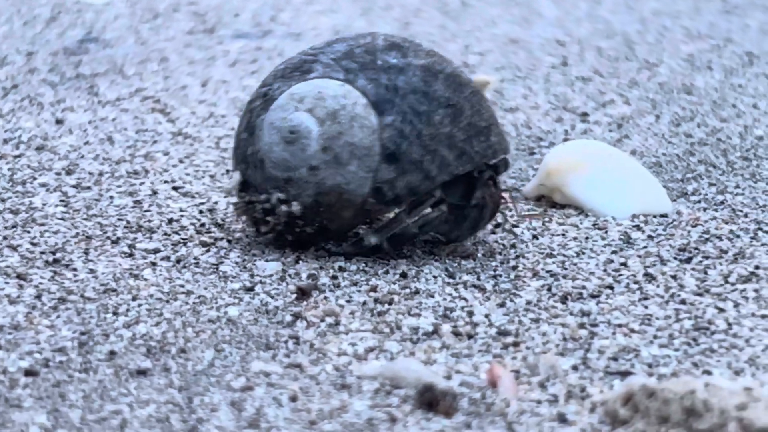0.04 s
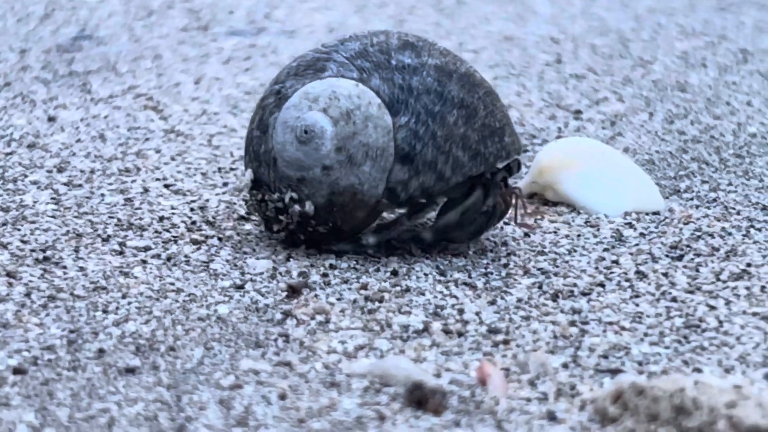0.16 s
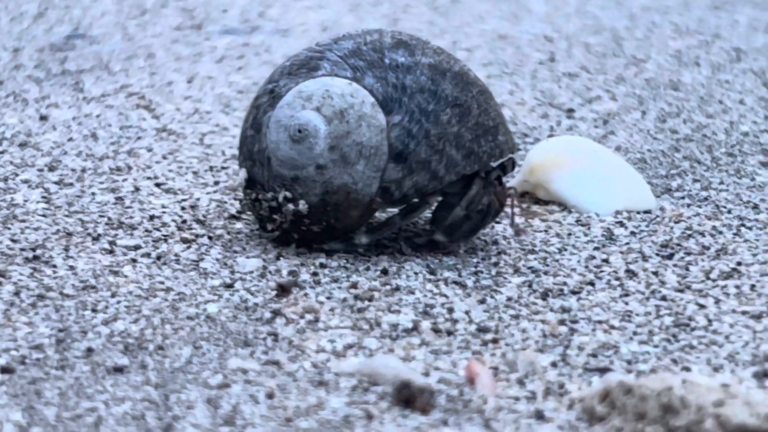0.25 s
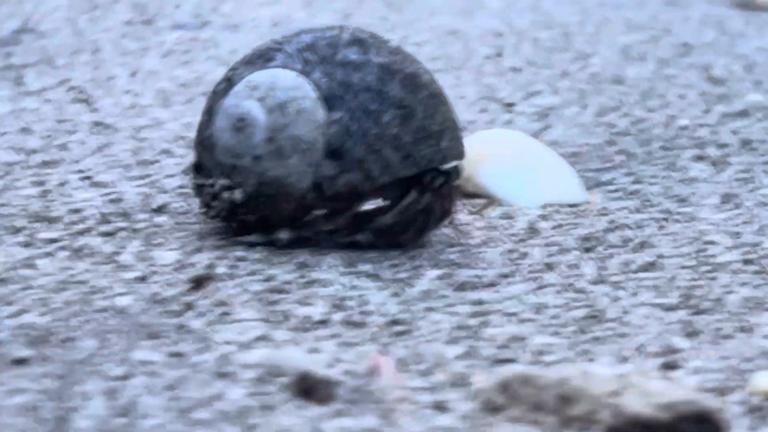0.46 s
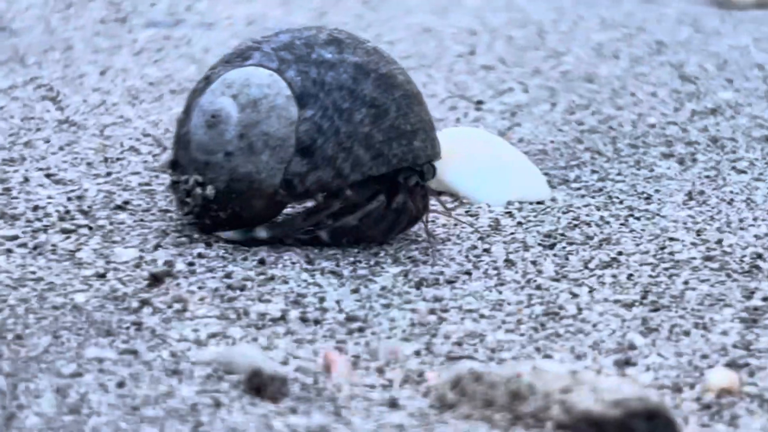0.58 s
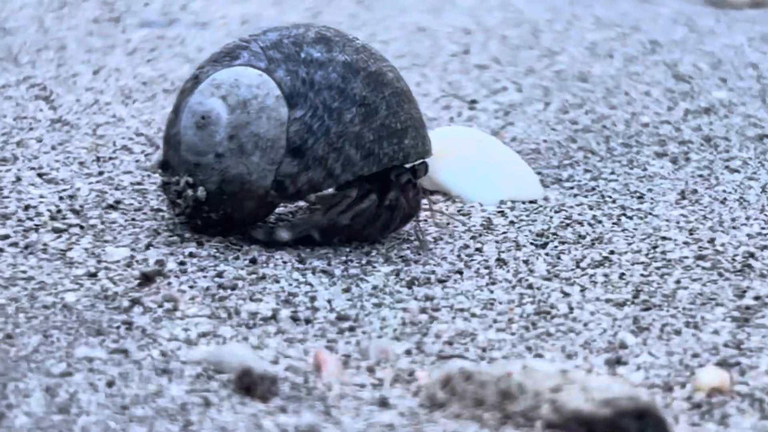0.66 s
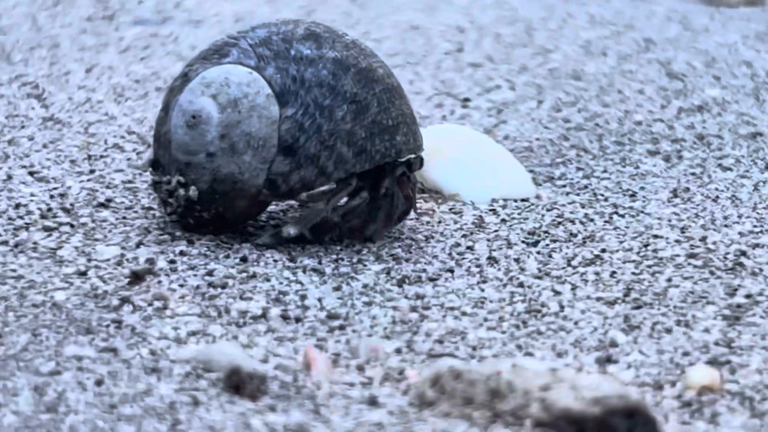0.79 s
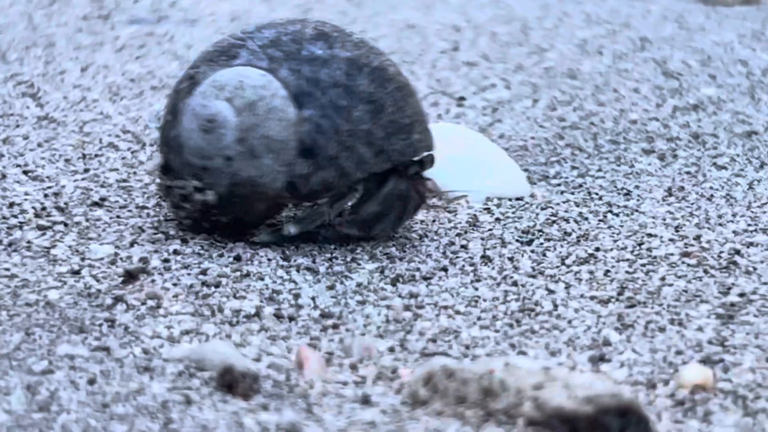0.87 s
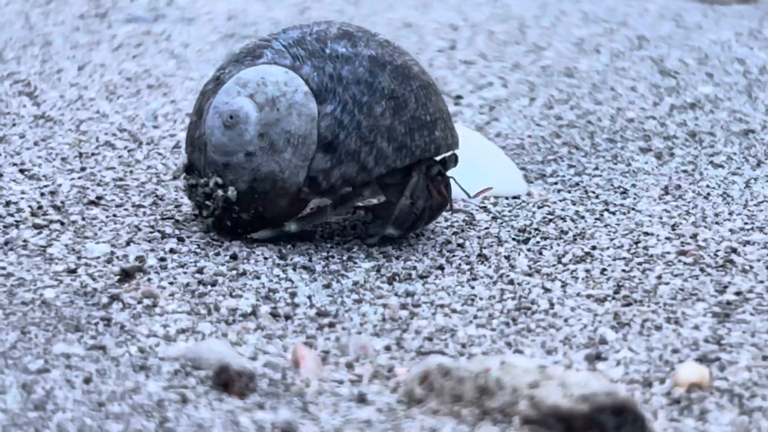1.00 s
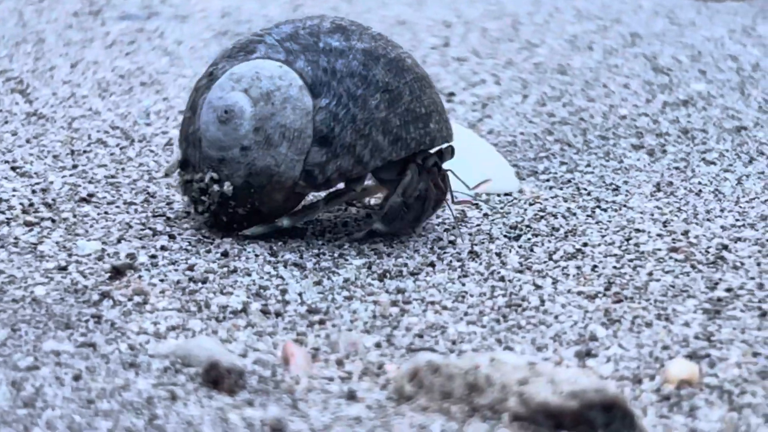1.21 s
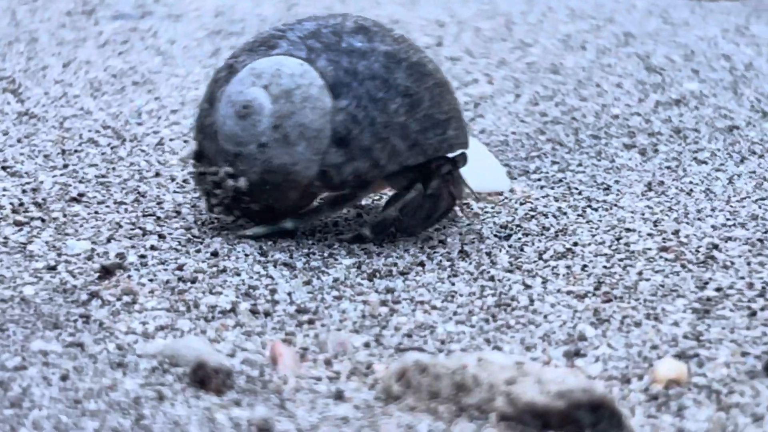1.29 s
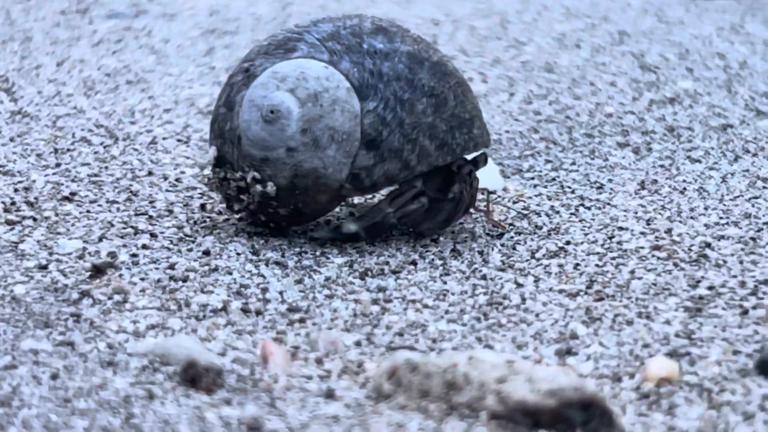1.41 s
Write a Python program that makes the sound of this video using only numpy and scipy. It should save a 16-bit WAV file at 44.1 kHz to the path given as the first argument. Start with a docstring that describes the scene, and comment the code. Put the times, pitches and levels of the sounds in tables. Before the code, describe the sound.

Wind buffets a microphone close to beach sand, over a faint, steady wash of distant surf. The lumpy rumble swells from about 0.3 to 0.5 seconds with soft bumps and a grainy, rustling hiss, then dies away by 1.1 seconds, where a very faint plink sounds. From 1.2 seconds the light hiss returns with a few tiny sand ticks and a small bump near 1.4 seconds.

```python
"""Wind and surf on a beach.

Distant surf washes steadily, heard through a small hand-held microphone close to the sand.
The eddies of a gust buffet the microphone in a lumpy rumble and die away; a grainy, rustling
hiss swells with the gust and returns alone near the end. Sand grains tick, soft bumps excite
the damped modes of the housing, and a faint plink sounds in the lull."""
import sys
import numpy as np
from scipy import signal
from scipy.fft import rfft, irfft
from scipy.io import wavfile

SR = 44100
rng = np.random.default_rng(int(sys.argv[2]) if len(sys.argv) > 2 else 0)


def bounce(signal):
    """Save signal as a 16-bit WAV file at the path given by the first command-line argument."""
    frames = np.transpose(np.atleast_2d(signal))
    limited = np.clip(frames, -1, 1)
    pcm = np.round(limited * 32767).astype(np.int16)
    wavfile.write(sys.argv[1], SR, pcm)


N = 63945

# stereo side-to-mid ratio, before each source's offset: f/Hz, ratio/dB
WIDTH = [(60, -6.5), (110, -5.5), (200, -14.5), (330, -11), (480, -3.5), (750, -0.5), (1050, -0.5),
         (1500, -4.5), (2300, -18), (3200, -19), (4400, -39), (7000, -31.5), (14000, -29)]
# envelopes of the surf, gust, midrange rustle and treble hiss: t/s, level/dB
SURF_LEVEL = [(0, -49.5), (0.3, -52.5), (0.8, -46.5), (1.05, -46.5), (1.13, -53), (1.22, -49.5),
              (1.35, -48), (1.45, -49.5)]
GUST_LEVEL = [(0, -44.5), (0.2, -39.5), (0.275, -32.5), (0.32, -30.5), (0.37, -25.5), (0.445, -28.5),
              (0.5, -30.0), (0.56, -35.5), (0.68, -38.5), (0.73, -38), (0.82, -36), (0.9, -44.5),
              (1.01, -42.5), (1.075, -43.5), (1.11, -66.5), (1.2, -44), (1.27, -53), (1.34, -51),
              (1.45, -50.5)]
RUSTLE_LEVEL = [(0, -61), (0.27, -57.0), (0.295, -38), (0.32, -48.5), (0.36, -39.5), (0.44, -42.5),
                (0.48, -53), (0.56, -59), (0.62, -49.5), (0.72, -72), (0.84, -50.5), (0.89, -55),
                (1.05, -63), (1.14, -57.5), (1.21, -55), (1.3, -51.5), (1.36, -80), (1.4, -44),
                (1.45, -49.5)]
HISS_LEVEL = [(0, -61.5), (0.08, -56), (0.15, -57.0), (0.24, -53), (0.378, -43.5), (0.5, -47),
              (0.568, -55.5), (0.622, -51.5), (0.69, -58), (0.81, -53.5), (0.94, -65.5), (0.99, -59),
              (1.14, -57.5), (1.205, -49), (1.24, -53), (1.285, -51.5), (1.36, -59), (1.42, -48.5),
              (1.45, -48)]
# spectral densities of the same four and of a shrill background band: f/Hz, relative level/dB
SURF_SPECTRUM = [(30, 1.5), (45, 12.5), (60, 11), (100, -1.5), (250, -14), (700, 0), (1100, -6.5),
                 (1700, -14), (3000, -22.0), (4500, -19.5), (5300, -30.5), (9000, -43), (15000, -37)]
GUST_SPECTRUM = [(30, -21.5), (45, 5), (65, 3), (110, -2.0), (170, -0.5), (300, -7.0), (450, -9),
                 (620, -10.5), (820, -17), (1300, -24), (2500, -37.5), (6000, -65.5)]
RUSTLE_SPECTRUM = [(200, -5), (400, 2.5), (600, 5), (800, -2.5), (1080, 2.5), (1550, 2.5), (1850, -4.5),
                   (2400, -6.5), (3000, -16.5), (5000, -29.5), (9000, -34)]
HISS_SPECTRUM = [(1000, -11), (2500, 1), (4000, -1), (5500, -3), (7000, 0.5), (8700, 2), (10000, -0.5),
                 (11500, 1.5), (14000, -6.5), (15500, -4)]
SHRILL_SPECTRUM = [(3500, -40), (4050, 2), (4300, -12), (4600, -1), (4850, -4), (5300, -35)]
# impacts of single sand grains: t/s, level/dB, f/Hz
SAND_TICKS = [(0.061, -32.5, 10900), (0.0724, -39, 3500), (.6175, -37, 3200), (0.8442, -28.5, 2010),
              (1.156, -39, 7500), (1.2103, -39, 7200), (1.2900, -28.5, 2600), (1.3073, -34, 2400),
              (1.3392, -28, 2280)]
# bumps on the housing: t/s, thud level before softening/dB, thud f/Hz, tick level/dB
BUMPS = [(0.2841, -24, 1340, -33), (0.294, -14.5, 246, -59), (0.3376, -39, 325, -35),
         (0.3648, -11.5, 324, -40), (0.384, -17, 100, -55), (0.421, -9.5, 263, -34),
         (.4440, -17.5, 280, -31.5), (0.474, -14.5, 228, -47), (0.4927, -25, 490, -57),
         (0.6208, -21.5, 169, -48), (.7560, -28.5, 222, -64), (0.798, -26.5, 610, -55),
         (1.0269, -45, 400, -32.5), (1.0790, -25.5, 786, -62), (1.3711, -28, 950, -36.5),
         (1.372, -24.5, 487, -58), (1.3784, -35, 178, -65)]
# modes of the housing: f/Hz, level relative to the tick/dB, t60/s
HOUSING_MODES = [(1690, -2, 0.0026), (2394, -1, 0.0074), (5250, -12, 0.0041)]
# phase shift from the microphone's stereo widening: f/Hz, lead of the left channel/rad
TREBLE_PHASE = [(7450, 0), (8550, -1.1), (9150, -3.1), (10850, -3.2), (11250, -4.2), (12200, -5.2),
                (12550, -6.25), (14400, -6.3), (15300, -8.8)]


def from_db(db):
    """Amplitude ratio: tenfold for every 20 dB."""
    return 10 ** (np.asarray(db) / 20)


def envelope(points):
    """Exponential growth and decay: straight lines in decibels between points in time."""
    return from_db(np.interp(np.arange(N) / SR, *np.transpose(points)))


def gain_at(points, hz):
    """Power-law response: straight lines in decibels against log frequency."""
    f, db = np.transpose(points)
    return from_db(np.interp(np.log(hz + 1), np.log(f), db))


def unit_power(x):
    """Normalisation to a mean square of one."""
    return x / np.sqrt(np.mean(x ** 2) + 1e-20)


def minimum_phase(gain):
    """Causality: a gain curve takes the phase of a filter that rings only after it is struck."""
    cepstrum = irfft(np.log(gain), N)
    cepstrum[1:] *= 2 * (np.arange(1, N) < N / 2)
    return np.exp(rfft(cepstrum))


def coloured(streams, spectrum, width_db=0):
    """Mid-side stereo: the sum and difference of two filtered streams, at unit power."""
    hz = np.arange(N // 2 + 1) * SR / N
    width = gain_at(WIDTH, hz) * from_db(width_db)
    mid, side = rfft(streams) * minimum_phase(gain_at(spectrum, hz) / np.sqrt(1 + width ** 2))
    return unit_power(irfft(np.array([mid + width * side, mid - width * side]), N))


def shot_noise(per_s, spread_db, share):
    """Two Poisson streams of uneven impulses carry a share of the power; Gaussian noise has the rest."""
    sizes = from_db(spread_db * np.minimum(rng.exponential(1, (2, N)), 4))
    signs = rng.choice([-1, 1], (2, N))
    arrivals = rng.random((2, N)) < per_s / SR
    clicks = unit_power(sizes * signs * arrivals)
    return np.sqrt(share) * clicks + np.sqrt(1 - share) * rng.standard_normal((2, N))


def ring(start_s, hz, t60):
    """Free vibration of a damped oscillator, falling 60 dB in t60 seconds."""
    age = np.maximum(np.arange(N) / SR - start_s, 0)
    return np.sin(2 * np.pi * hz * age) * np.exp(-np.log(1000) * age / t60)


def surf():
    """Far waves add incoherently into a smooth, wide wash of Gaussian noise."""
    return envelope(SURF_LEVEL) * coloured(rng.standard_normal((2, N)), SURF_SPECTRUM, width_db=1)


def shrill_band():
    """Stationary narrow-band noise, heard as a faint, shrill hiss."""
    return from_db(-69) * coloured(rng.standard_normal((2, N)), SHRILL_SPECTRUM)


def wind():
    """Turbulence: eddies strike the microphone as a stream of dull pressure pulses."""
    eddies = shot_noise(per_s=500, spread_db=3.5, share=0.62)
    return envelope(GUST_LEVEL) * coloured(eddies, GUST_SPECTRUM)


def rustle():
    """Shot noise filtered to the midrange is heard as a grainy rustle."""
    grains = shot_noise(per_s=1800, spread_db=3, share=0.5)
    return envelope(RUSTLE_LEVEL) * coloured(grains, RUSTLE_SPECTRUM, width_db=-6.5)


def hiss(flutter_db=1.34, flutter_hz=147):
    """Random amplitude modulation makes a fine treble hiss flutter."""
    fizz = shot_noise(per_s=4500, spread_db=1, share=0.32)
    treble = coloured(fizz, HISS_SPECTRUM, width_db=-3)
    smoothing = signal.butter(2, flutter_hz, fs=SR, output="sos")
    flutter = unit_power(signal.sosfilt(smoothing, rng.standard_normal(N)))
    return envelope(HISS_LEVEL) * treble * from_db(flutter_db * flutter)


def sand_ticks():
    """Each grain's impact is a heavily damped vibration, so brief that it is heard as a tick."""
    return sum(from_db(db) * ring(s, hz, t60=0.0013) for s, db, hz in SAND_TICKS)


def bumps(thud_cycles=3.95, contact_hz=1420, pan_db=0.5):
    """Impact excitation: each bump gives a thud, low-passed by soft contact, and rings the housing."""
    thuds = sum(from_db(db) * ring(s, hz, thud_cycles / hz) for s, db, hz, _ in BUMPS)
    softened = signal.sosfilt(signal.butter(2, contact_hz, fs=SR, output="sos"), thuds)
    ticks = sum(from_db(db + mode_db) * ring(s, hz, t60)
                for s, _, _, db in BUMPS for hz, mode_db, t60 in HOUSING_MODES)
    return (softened + ticks) * from_db(pan_db * np.array([[.5], [-.5]]))


def plink():
    """A single decaying mode, heard as a faint plink in the lull."""
    return from_db(-51) * ring(start_s=1.128, hz=1200, t60=0.05)


def scene():
    """Superposition of the distant surf and the sounds at the microphone."""
    return surf() + shrill_band() + wind() + rustle() + hiss() + sand_ticks() + bumps() + plink()


def record(dry, low_cut_hz=59.2, high_cut_hz=15750):
    """The microphone limits the bandwidth, and its stereo widening turns the top treble out of phase."""
    dry = signal.sosfilt(signal.butter(4, low_cut_hz, "high", fs=SR, output="sos"), dry)
    hz = np.arange(N + 1) * SR / (2 * N)
    phase_shift = np.exp(1j * np.interp(hz, *np.transpose(TREBLE_PHASE)))
    low_pass = 1 / np.sqrt(1 + (hz / high_cut_hz) ** 400)
    left, right = rfft(dry, 2 * N) * low_pass
    return irfft(np.array([left * phase_shift, right]))[:, :N]


dry = scene()
out = record(dry)
bounce(out)
```